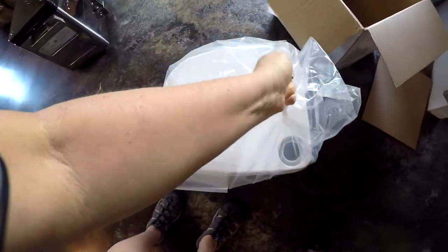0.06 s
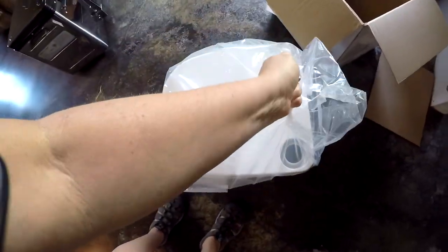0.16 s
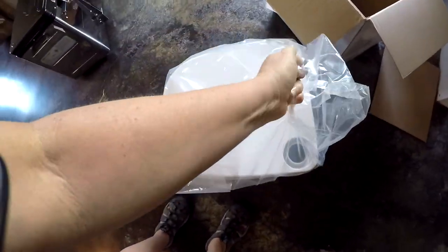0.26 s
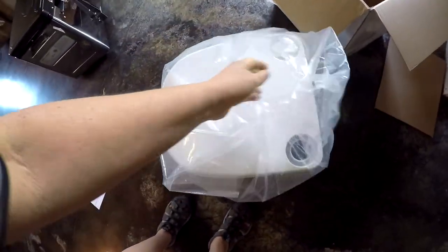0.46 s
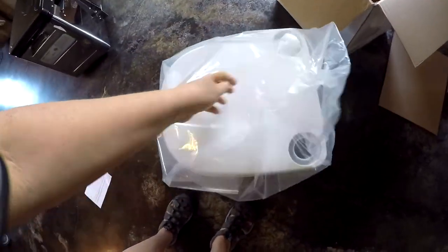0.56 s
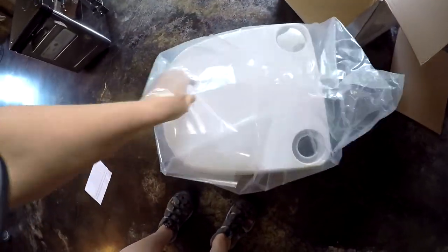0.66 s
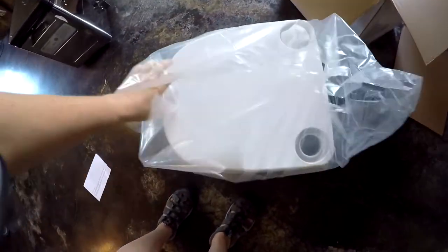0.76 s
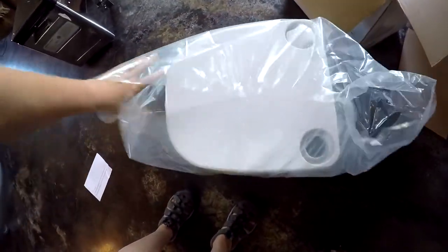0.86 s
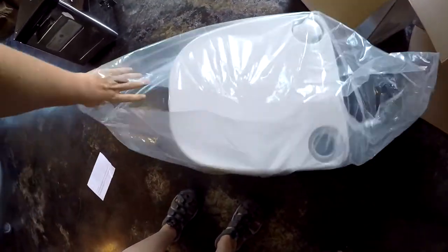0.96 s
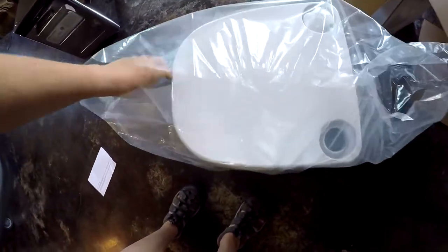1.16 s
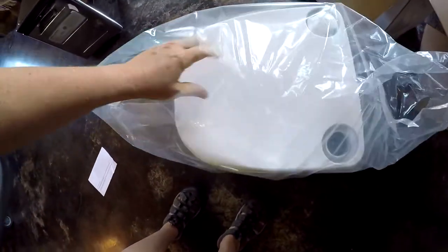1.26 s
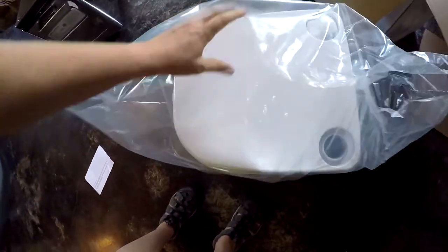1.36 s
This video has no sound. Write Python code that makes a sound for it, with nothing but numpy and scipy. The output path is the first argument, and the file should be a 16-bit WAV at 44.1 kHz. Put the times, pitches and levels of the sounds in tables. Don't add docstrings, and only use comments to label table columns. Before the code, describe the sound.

Close, dry rustling of heavy clear film around a hollow plastic tank; the tank thuds and rocks early, its wall judders on the floor, then the bag is pulled taut with dense sharp crackles and goes slack.

```python
import sys
import numpy as np
from scipy import signal
from scipy.fft import rfft, irfft
from scipy.io import wavfile
from scipy.ndimage import uniform_filter1d

SR = 44100
rng = np.random.default_rng(int(sys.argv[2]) if len(sys.argv) > 2 else 0)


def invert_db(x):
    u = np.asarray(x, float) / 20
    return 10 ** u


def to_wav(sig):
    pcm = np.clip(np.atleast_2d(sig), -1, 1) * 32767
    pcm = np.round(pcm).astype(np.int16)
    wavfile.write(sys.argv[1], SR, pcm.T)


N = 61739

# (time [s], peak level [dB], body [Hz], treble
# share [dB])
CREASE_SNAPS = [(0.0189, -27.0, 4120, -3), (0.073, -26.0, 2680, -11), (0.0795, -32.5, 3270, -11),
                (0.0846, -26.0, 3360, -8), (0.0976, -33.5, 3190, -3), (0.1638, -28.0, 3380, -1),
                (0.1953, -31.0, 4090, -5), (0.3782, -21.5, 3080, -20), (0.4048, -28.0, 3550, -11),
                (0.4066, -28.0, 3740, -11), (0.4137, -29.5, 2680, -15), (0.431, -24.0, 3280, -4),
                (0.431, -22.0, 3280, -4), (0.4333, -30.5, 3150, -4), (0.4491, -27.0, 3320, -12),
                (0.4566, -32.5, 3820, -11), (0.4649, -31.0, 4590, -3), (0.4712, -27.5, 4070, -1),
                (0.478, -20.0, 4780, -3), (0.4835, -25.5, 4110, 0), (0.4851, -24.0, 3840, -4),
                (0.5018, -33.5, 2280, -3), (0.5301, -28.0, 3160, -15), (0.5402, -28.0, 4600, -7),
                (0.5471, -25.5, 3960, -9), (0.5562, -36.5, 2740, -15), (0.5606, -24.5, 2590, -14),
                (0.574, -26.5, 3690, -10), (0.5758, -26.0, 3320, -10), (0.5797, -26.0, 4660, -7),
                (0.5818, -26.0, 4230, -5), (0.5851, -26.0, 4750, -5), (0.608, -19.5, 3440, -11),
                (0.6182, -19.5, 4800, -1), (0.6239, -22.5, 3180, -13), (0.6275, -29.5, 2810, -14),
                (0.6367, -27.5, 3110, -14), (0.6432, -25.5, 3880, -10), (0.6655, -31.0, 2950, -10),
                (0.7311, -37.0, 3430, -6), (0.7684, -23.0, 3440, -17), (0.7965, -25.5, 2730, -13),
              (0.8051, -32.5, 2510, -14), (0.8404, -29.5, 2980, -17), (0.8429, -31.0, 3180, -17),
              (0.8554, -34.5, 3810, -12), (0.8767, -26.5, 2400, -19), (0.8793, -27.5, 2530, -23),
              (0.8848, -31.5, 2310, -18), (0.8963, -19.0, 3680, -8), (0.8978, -26.0, 3540, -12),
              (0.9019, -24.5, 3520, -10), (0.9058, -26.0, 3110, -8), (0.9112, -28.0, 3120, -14),
              (0.9143, -24.5, 2510, -14), (0.9235, -30.5, 2650, -15), (0.9343, -24.5, 4100, -9),
              (0.9771, -21.5, 3280, -14), (0.9925, -25.5, 3030, -13), (1.0032, -14.0, 4670, -3),
              (1.0072, -20.0, 4130, -4), (1.0157, -23.5, 3420, -7), (1.0249, -24.0, 2650, -11),
              (1.0368, -25.5, 3490, -11), (1.0419, -18.5, 3540, -8), (1.0562, -19.5, 4440, -4),
              (1.0582, -20.5, 4390, -6), (1.0679, -19.5, 3180, -3), (1.0848, -21.5, 3550, -9),
              (1.0868, -15.0, 3750, -6), (1.0982, -25.0, 3430, -10), (1.1067, -19.5, 3500, -6),
              (1.12, -23.5, 3380, -2), (1.1363, -19.0, 3980, 1), (1.1409, -28.5, 2840, -6),
              (1.1539, -31.0, 3900, -6), (1.2016, -30.0, 3800, -6), (1.2382, -35.0, 2560, -19),
              (1.2683, -31.0, 2910, -23), (1.3013, -34.5, 3180, -20), (1.3659, -37.0, 3090, -19),
              (1.3886, -30.5, 3400, -21)]
# (time [s], peak level [dB], body [Hz], treble
# share [dB])
SNAPS_SLACK = [(.2436, -18, 1500, -25), (.768, -26, 1150, -40), (1.003, -23, 1250, -40),
               (1.05, -26, 780, -40), (1.058, -25, 780, -40), (1.086, -28, 800, -40),
               (1.093, -28, 700, -40), (1.139, -25, 1100, -40), (1.1865, -31, 420, -40),
               (.893, -27, 500, -40), (.414, -29, 750, -40), (1.2682, -31, 800, -40),
               (1.305, -38, 350, -40), (1.328, -39, 240, -40), (.5225, -30, 280, -40),
               (1.098, -28, 300, -40), (.02, -38, 650, -40), (1.391, -35, 1200, -40),
               (1.027, -28, 1100, -40)]
# (time [s], rustle level [dB], brightness [dB])
HAND_WORK = [(0, -53, -10), (.07, -50.5, 5), (.1, -43.5, 6.5), (.15, -54.5, 0.5), (.24, -45, -6),
             (.36, -50.5, -1), (.45, -44, 4.5), (.52, -46, -1), (.6, -43, -4), (.7, -44.5, 1),
             (.86, -44, -6.5), (.9, -35.5, -2), (.96, -40.5, -11.5), (1.02, -34.5, 1.5), (1.1, -34, 4),
             (1.16, -44.5, 5.5), (1.23, -47.5, -7), (1.4, -51, -18)]
# (frequency [Hz], level [dB])
FILM_COLOUR = [(120, -29), (220, -6), (509, -2), (806, -1.5), (1870, -3.5), (6170, -12), (10000, -17),
               (16000, -19)]
# (time [s], strength [dB], hardness [Hz], share of the deep boom [dB])
BLOWS = [
    (.2432, -19, 2500, -12),
    (.2484, -16, 1800, -3),
    (.2770, -29, 400, -14),
    (.3000, -26, 400, -20),
    (.3150, -28, 260, -20),
    (.3620, -33, 260, -8),
    (.432, -39, 260, -3),
]
# (frequency [Hz], level [dB], 60 dB decay [s])
SHELL_MODES = [(386, 4, .085), (120, -12, .15), (186, -8, .18), (217, -6, .25), (250, -3, .08),
               (310, -8, .15), (428, -12, .08), (575, -13, .15), (660, -19, .1), (807, -14, .05)]
# (time [s], slips per second [Hz], level [dB])
GROAN = [
    (.521, 160, -30),
    (.528, 163, -33.5),
    (.553, 175, -33),
    (.567, 162, -38),
    (.582, 160, -36),
    (.6, 148, -41),
    (.62, 143, -43),
    (.635, 140, -52),
]
# (time [s], slips per second [Hz], level [dB])
DRAG = [
    (.65, 62.5, -52),
    (.68, 68.8, -39.5),
    (.74, 70.5, -44),
    (.80, 66.4, -47),
    (.83, 63.7, -80),
]
# (frequency [Hz], level [dB])
RUMBLE_COLOUR = [(11, -31), (18, -1), (70, -1), (130, -8), (200, -12), (400, -14), (520, -24), (880, -70)]
# (frequency [Hz], level per Hz [dB])
BACKGROUND_COLOUR = [(12, -28), (20, 1.5), (1660, -33), (4420, -23), (13900, -26.5), (16000, -24)]

SNAP_GAIN_DB, SNAP_RISE_S, SNAP_T60_S, SNAP_JAG_DB = -1.3, .0002, .013, 3
SNAP_TREBLE_DB, SNAP_RING_DB, SNAP_POP_DB, SNAP_POP_HZ = -1, -4, -13, 900
SNAP_WIDTH, SNAP_TICK, SNAP_RING_CYCLES = .6, 4, 11
GRAINS_PER_S, GRAIN_SPREAD_DB, GRAIN_T60_S, GRAIN_DB, HISS_DB = 2000, 2.1, .011, 2.5, -2
BOOM_HZ, BOOM_DB, BOOM_HOLD_S, BOOM_SAG_DB, BOOM_T60_S = 62.5, 10.5, .055, -20, 0.16
RING_RISE_S, DETUNE, WOBBLE_DB = .003, .06, 3
PUFF_DB, PUFF_T60_S, PUFF_HZ = -6, 0.3, 560
SLIP_JITTER, GROAN_OVERTONES_DB, DRAG_OVERTONES_DB = .015, (-10.5, -26), (-16, -13)
RUMBLE_DB, RUMBLE_FOLLOW, RUMBLE_LUMP_DB = -2.5, 0.61, 1.5
ROOM_DB, ROOM_T60_S, ROOM_TREBLE_T60_S = -20, 0.47, 0.063
BACKGROUND_DB = -61.5
EDGE_HZ, ABOVE_EDGE_DB = 15170, -21


def evened(x):
    return x / np.sqrt(np.mean(x ** 2) + 1e-20)


def coloured(x, points):
    f, db = np.transpose(points)
    hz = np.fft.rfftfreq(len(x), 1 / SR)
    gain = invert_db(np.interp(np.log(hz + 1), np.log(f + 1), db))
    return irfft(rfft(x) * gain, len(x))


def add(mix, s, sound):
    part = mix[round(s * SR):][:len(sound)]
    part += sound[:len(part)]


def band(x, lo_hz, hi_hz, order=2):
    edges = [lo_hz, min(hi_hz, .49 * SR)]
    return signal.sosfilt(signal.butter(order, edges, "bandpass", fs=SR, output="sos"), x)


def slow(hz):
    return evened(band(rng.standard_normal(N), hz / 8, hz))


def curve(table, column=1):
    columns = np.transpose(table)
    return np.interp(np.arange(N) / SR, columns[0], columns[column])


def thumps():
    out, t = np.zeros(N), np.arange(SR // 2) / SR
    boom_db = BOOM_DB + BOOM_SAG_DB * t / BOOM_HOLD_S - 60 * np.maximum(t - BOOM_HOLD_S, 0) / BOOM_T60_S
    boom = invert_db(boom_db) * np.sin(2 * np.pi * BOOM_HZ * t)
    hz, mode_db, t60 = np.transpose(SHELL_MODES)[:, :, None]
    landing_s = BLOWS[1][0]
    for s, db, hard_hz, boom_share_db in BLOWS:
        air = rng.standard_normal(len(t))
        rub = evened(uniform_filter1d(rng.standard_normal((len(SHELL_MODES), len(t))), size=500))
        late = np.clip((s + t - landing_s) / BOOM_HOLD_S, 0, 1)
        shift = 1 + DETUNE * late[0] * rng.standard_normal(hz.shape)
        mode_level = invert_db(mode_db - 60 * t / t60 + WOBBLE_DB * late * rub)
        ring = (mode_level * np.sin(2 * np.pi * hz * shift * t)).sum(axis=0)
        puff = invert_db(PUFF_DB - 60 * t / PUFF_T60_S) * evened(band(air, PUFF_HZ / 5, PUFF_HZ))
        body = (1 - np.exp(-t / RING_RISE_S)) * (ring + invert_db(boom_share_db) * boom)
        add(out, s, invert_db(db) * band(puff - body, 57, hard_hz, order=1))
    return out


def judder(table, overtones_db):
    t = np.arange(N) / SR
    turns = np.cumsum(curve(table) * (1 + SLIP_JITTER * slow(53))) / SR
    tone = np.sin(2 * np.pi * turns)
    for k, db in enumerate(overtones_db, start=2):
        tone += invert_db(db) * np.sin(2 * np.pi * k * turns)
    gate = np.clip(np.minimum(t - table[0][0], table[-1][0] - t) / 0.0027, 0, 1)
    return np.sqrt(2) * invert_db(curve(table, column=2)) * gate * tone


def snaps():
    out, t = np.zeros(N), np.arange(1024) / SR
    rows = CREASE_SNAPS + SNAPS_SLACK
    tick = SNAP_TICK * (np.arange(len(t)) == round(SNAP_RISE_S * SR))
    draws = rng.standard_normal((len(rows), 4, len(t))) - tick
    for (s, db, hz, treble_db), (body_air, edge_air, pop_air, jag_air) in zip(rows, draws):
        jag = evened(uniform_filter1d(jag_air, size=20))
        shape = np.minimum(t / SNAP_RISE_S, 1) * invert_db(-60 * t / SNAP_T60_S + SNAP_JAG_DB * jag)
        body = band(body_air * shape, hz * (1 - .5 * SNAP_WIDTH), hz * (1 + SNAP_WIDTH))
        edge = band(edge_air * shape, 6500, 16000)
        pop = band(pop_air * shape, SNAP_POP_HZ / 2, SNAP_POP_HZ * 2)
        ring = np.sin(2 * np.pi * hz * t) * invert_db(-60 * t * hz / SNAP_RING_CYCLES)
        burst = evened(body) + invert_db(SNAP_RING_DB) * evened(ring)
        burst += invert_db(treble_db + SNAP_TREBLE_DB) * evened(edge) + invert_db(SNAP_POP_DB) * evened(pop)
        add(out, s, invert_db(db + SNAP_GAIN_DB) * burst / abs(burst).max())
    return out


def rustle():
    size = invert_db(GRAIN_SPREAD_DB * np.minimum(rng.exponential(1, N), 5))
    size *= rng.random(N) < GRAINS_PER_S / SR
    kind, t, grains = rng.integers(0, 30, N), np.arange(800) / SR, np.zeros(N)
    for k, hz in enumerate(np.geomspace(500, 14000, num=30)):
        grain = band(rng.standard_normal(len(t)) * invert_db(-60 * t / GRAIN_T60_S), hz / 1.65, hz * 1.56)
        grains += signal.oaconvolve(size * (kind == k), evened(grain) * np.sqrt(hz))[:N]
    hiss = invert_db(HISS_DB + 1.5 * slow(35)) * rng.standard_normal(N)
    film = coloured(invert_db(GRAIN_DB) * evened(grains) + hiss, FILM_COLOUR)
    film = film / np.std(band(film, 570, 13400))
    treble = band(film, 3600, 18800)
    brightness = invert_db(curve(HAND_WORK, column=2))
    return invert_db(curve(HAND_WORK)) * (film + (brightness - 1) * treble)


def rumble():
    work_db = curve(HAND_WORK)
    follow_db = work_db.mean() + RUMBLE_FOLLOW * (work_db - work_db.mean())
    level = invert_db(RUMBLE_DB + follow_db + RUMBLE_LUMP_DB * slow(19.4))
    return level * evened(coloured(rng.standard_normal(N), RUMBLE_COLOUR + [(900, -90)]))


def room(x):
    taps, t = np.zeros(SR // 2), np.arange(SR // 2) / SR
    at = np.arange(200, len(taps) - 20, 20)
    taps[at + rng.integers(0, 20, len(at))] = rng.choice([-1., 1.], len(at))
    tail = band(taps, 150, 5600) * invert_db(-60 * t / ROOM_T60_S)
    tail += band(taps, 1800, 23000) * invert_db(-60 * t / ROOM_TREBLE_T60_S)
    return signal.fftconvolve(x, tail / np.linalg.norm(tail))[:N]


def background():
    return invert_db(BACKGROUND_DB) * evened(coloured(rng.standard_normal(N), BACKGROUND_COLOUR))


def scene():
    near = snaps() + thumps()
    steady = background()
    echoes = invert_db(ROOM_DB) * room(near)
    slips = judder(GROAN, GROAN_OVERTONES_DB) + judder(DRAG, DRAG_OVERTONES_DB)
    mix = near + echoes + slips + rustle() + rumble() + steady
    return mix[None]


def top_cut(x):
    return signal.sosfilt(signal.butter(12, 16640, fs=SR, output="sos"), x)


def record(dry):
    low, wide = (signal.oaconvolve(dry, signal.firwin(255, hz, fs=SR)[None], "same")
                 for hz in (EDGE_HZ, 16500))
    return top_cut(low + invert_db(ABOVE_EDGE_DB) * (wide - low))


dry = scene()
out = record(dry)
to_wav(out)
```